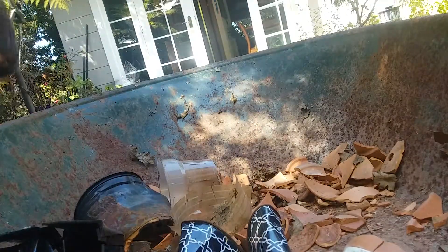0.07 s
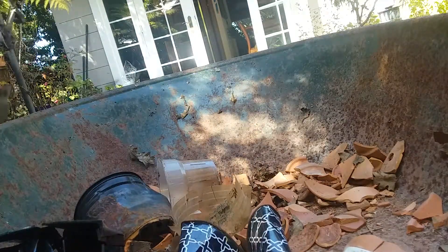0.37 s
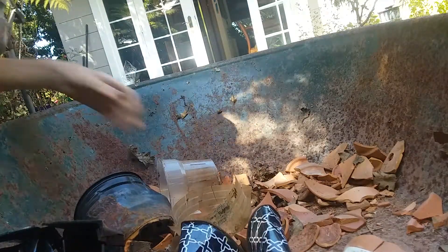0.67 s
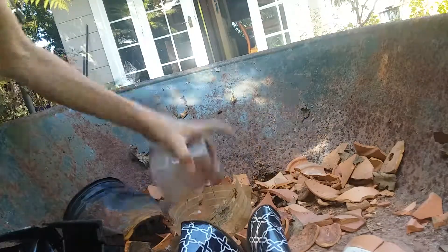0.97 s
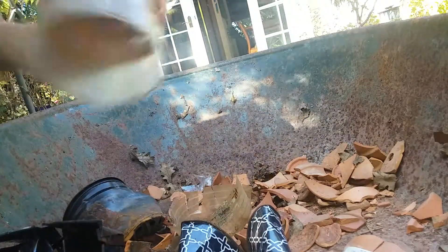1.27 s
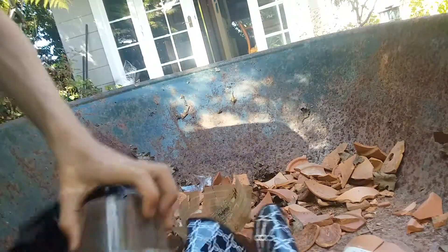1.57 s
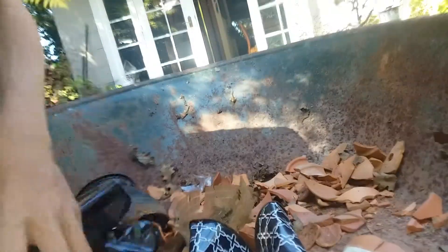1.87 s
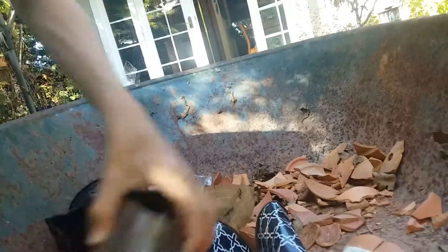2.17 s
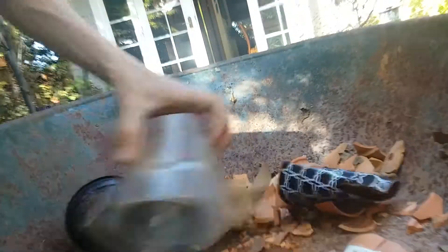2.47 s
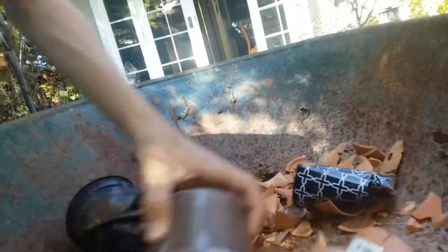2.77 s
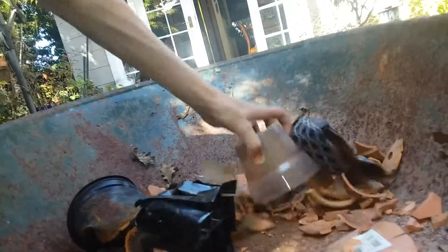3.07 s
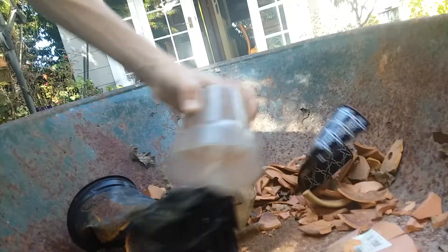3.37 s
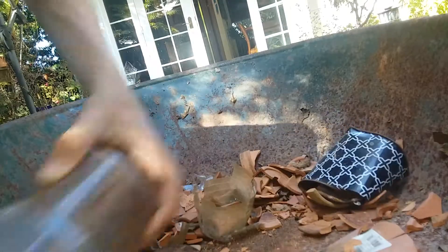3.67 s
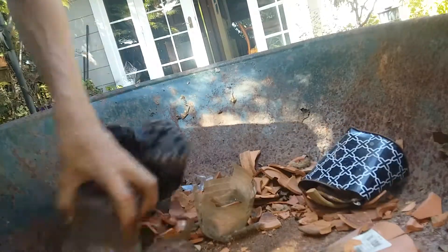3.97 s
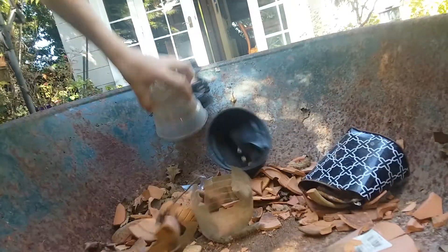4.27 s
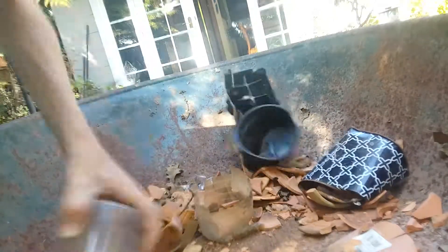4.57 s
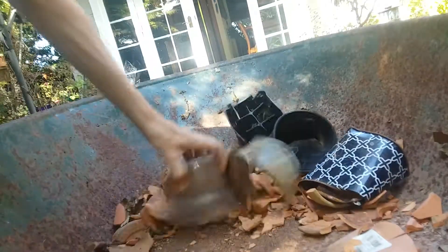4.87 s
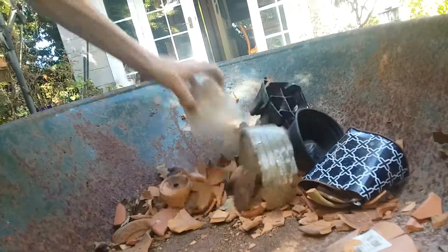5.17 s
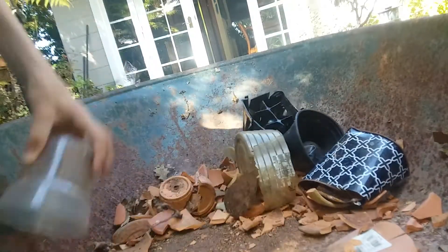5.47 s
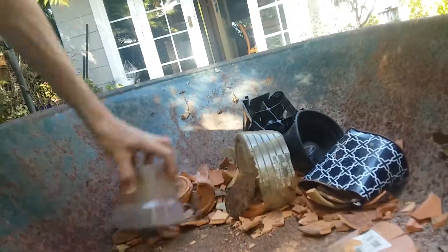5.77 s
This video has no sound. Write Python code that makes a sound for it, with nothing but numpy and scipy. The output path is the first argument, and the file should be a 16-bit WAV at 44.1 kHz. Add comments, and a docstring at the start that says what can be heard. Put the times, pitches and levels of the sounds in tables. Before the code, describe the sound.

Broken clay shards crunch, scrape and clink as a plastic tub scoops through them in a booming steel wheelbarrow, with light pots clacking.

```python
"""Terracotta shards in a wheelbarrow

Outdoors, stereo microphones close to the steel tray. A hand scoops through the shards with a plastic
tub. Each shove builds, holds and settles: a dense crunch of tiny contacts that makes the tray drone.
Shards clink, light flowerpots clack and tumble, and heavier bumps boom in the sheet steel."""
import sys
import numpy as np
from scipy import signal
from scipy.fft import rfft, irfft, next_fast_len
from scipy.io import wavfile
from scipy.ndimage import map_coordinates

SR = 44100
rng = np.random.default_rng(int(sys.argv[2]) if len(sys.argv) > 2 else 0)


def file_out(sig):
    """Save sig as 16-bit WAV at sys.argv[1]."""
    # one column per channel
    cols = np.atleast_2d(sig).T
    # limit, then scale
    lim = np.clip(cols, -1, 1)
    pcm = np.round(lim * 32767).astype(np.int16)
    wavfile.write(sys.argv[1], SR, pcm)


N = 257103

# Levels are relative within each layer; balance is left minus right.
# outdoor air: f/Hz, level/dB
AIR_SPECTRUM = [(15, -95), (25, -42), (48, -2), (108, -3.5), (130, -14.5), (145, -3), (285, -17.5),
                (677, -15.5), (1940, -26.5), (2690, -24), (2990, -24.5), (6050, -32), (7310, -31.5),
                (8590, -42), (16000, -48)]
# faint background tones: f/Hz, level/dB
FAINT_TONES = [(668, -49.5), (920, -55), (1660, -60)]
# sharp ticks and dull taps close by, the first two from handling: t/s, tick level/dB, tap level/dB
TICKS = [(0.0348, -60, -32), (0.047, -43, -42), (0.588, -43.5, -40.5), (0.808, -34.5, -21.5),
         (0.8872, -35, -29), (1.3738, -24, -13), (1.465, -13, -15), (1.5597, -24, -12), (1.6249, -42, -18),
         (1.9485, -19.5, -25), (2.439, -22.5, -18), (2.495, -36, -33), (2.5372, -15.5, -28),
         (2.6148, -18, -24), (3.0391, -24, -15), (3.2027, -23, -16), (3.3424, -17.5, -32),
         (3.4091, -17, -44), (3.4336, -14.5, -18), (3.4887, -19.5, -30), (3.5682, -26, -35),
         (3.696, -28, -38.5), (3.8299, -22.5, -35.5), (3.984, -14, -37), (4.0309, -13.5, -15.5),
         (4.168, -21, -20), (4.212, -15, -35), (4.4142, -28.5, -21.5), (4.475, -30, -17.5),
         (4.5048, -27.5, -21), (5.2801, -30, -30), (5.446, -15, -38), (5.4856, -25, -24)]
# spectra of a sharp tick, a dull tap and the rattle of a knock: f/Hz, level/dB
TICK_SPECTRUM = [(300, -18), (1500, 20), (4000, 16.5), (7000, 8.5), (9000, 3.5), (12000, -0.5), (16000, -1)]
TAP_SPECTRUM = [(100, -21.5), (400, 0.5), (800, -0.5), (1600, -4.5), (2500, -13.5), (4000, -32),
                (8000, -41), (16000, -51)]
RATTLE_SPECTRUM = [(100, -37), (400, 3.5), (900, -21), (1600, 3), (2500, -6), (4000, -18), (8000, -26),
                   (16000, -43)]
# echo between the tray walls: f/Hz, t60/s
WALL_DECAY = [(200, 0.056), (1500, 0.18), (4000, 0.065), (12000, 0.064)]
# short hollow knocks (pots, hard hits on the tray, a faint handling tap): t/s, level/dB, f/Hz
HOLLOW_KNOCKS = [(0.091, -26.5, 770), (1.405, -16, 506), (1.625, -5.5, 751), (1.724, -12, 524),
                 (1.948, -12.5, 1968), (1.997, -6, 2225), (2.538, -5.5, 589), (3.203, 0, 956),
                 (3.218, -0.5, 647), (3.293, -4, 542), (3.305, -1, 1599), (3.405, -14, 1550),
                 (3.432, -10, 1507), (4.367, -21, 608), (4.402, -6, 699), (4.477, -22, 756),
                 (4.569, -10, 2180), (4.594, -3.5, 1666), (5.578, -12, 1660)]
# shoves into the pile: t/s, build-up/s, hold/s, settling t60/s, crunch level/dB, grit level/dB,
# pressure on the tray/dB, balance/dB
SHOVES = [(0.783, 0.035, .003, 0.24, -30.5, -50, -30, 2.5), (0.857, 0.03, 0.0067, 0.32, -33, -50, -31, 2.5),
          (1.366, .008, 0.011, 0.09, -17, -22.5, -39, 7.5),
          (1.387, 0.017, 0.024, 0.4, -17, -31.5, -14.5, 5.5),
          (1.474, 0.034, 0.0088, 0.44, -15, -27, -15.5, 3.5),
          (1.668, 0.054, 0.0069, .28, -19, -34.5, -14, 3),
          (1.997, 0.0039, 0.044, 0.19, -20, -34.5, -29.5, 7),
          (2.07, 0.033, 0.074, 0.39, -16.5, -28, -21.5, 4), (2.164, 0.036, 0.12, 0.42, -16, -31.5, -23, 6),
          (2.436, .004, 0.068, 0.34, -30, -45.5, -32.5, 0),
          (2.54, 0.0031, 0.022, 0.17, -24.5, -38.5, -19.5, -1),
          (2.621, 0.0046, .03, 0.25, -20.5, -31, -34, 8), (2.646, .025, 0.044, 0.65, -13.5, -30, -16, 0),
          (2.698, 0.061, .14, 0.6, -12, -27.5, -17.5, -0.5),
          (2.967, 0.016, .02, 0.43, -24.5, -33.5, -31, 2.5), (3.198, 0.011, 0.041, 0.39, -20, -48, -27, 1),
          (3.285, .006, 0.028, 0.27, -20, -48, -32, 0.5), (3.371, 0.078, 0.022, .28, -19.5, -35, -28, 5.5),
          (3.695, 0.0088, 0.048, 0.25, -38, -50.5, -52, 6.5),
          (3.743, 0.085, 0.076, .3, -29, -38.5, -29, 7.5), (3.891, 0.022, 0.05, 0.84, -21.5, -34, -18, 2.5),
          (3.987, 0.037, 0.058, 0.26, -19.5, -32, -45, 3.5),
          (4.143, 0.024, 0.0094, 0.068, -24.5, -31.5, -23, 2.5),
          (4.198, 0.003, 0.0078, 0.44, -30, -38, -30, 0), (4.481, 0.0094, 0.05, .2, -38, -48, -27, 2.5),
          (4.568, 0.012, 0.032, 0.41, -23, -28.5, -30, 5),
          (4.622, 0.056, 0.15, 0.38, -18.5, -30, -17.5, 2.5),
          (4.807, 0.053, 0.15, 0.52, -19.5, -31, -27.5, 2.5),
          (5.083, 0.017, 0.01, 0.49, -27, -37.5, -22.5, 3), (5.124, 0.028, 0.08, 1, -47.5, -47.5, -30, 1.5),
          (5.443, 0.0061, 0.022, 0.34, -27.5, -54, -16.5, 5.5),
          (5.567, 0.086, 0.017, 0.074, -24.5, -35, -14.5, 3),
          (5.693, 0.065, 0.043, 0.38, -19, -30.5, -17.5, 1)]
# spectra of coarse shards, fine grit and the damped tray floor: f/Hz, level/dB
CRUNCH_SPECTRUM = [(60, -68.5), (250, -11), (620, -2.5), (900, -4.5), (1250, -5), (1700, 0), (2400, -1),
                   (3000, -8), (4000, -12), (5500, -22), (9000, -35.5), (16000, -36.5)]
GRIT_SPECTRUM = [(500, -42), (2500, 5), (4000, 7), (5500, -1), (7200, 0), (8500, -8.5), (10500, -5),
                 (13000, -9), (16000, -15)]
FLOOR_SPECTRUM = [(30, -10), (70, -17.5), (110, 3.5), (200, 8.5), (270, -1.5), (450, 4), (700, -14.5),
                  (1200, -6.5), (4000, -46)]
# panel resonances that the scraping sets singing: f/Hz, width/Hz, level/dB
PANEL_MODES = [(592, 28, 3.5), (705, 29, -9), (765, 26, -7), (982, 26, 4.5), (1235, 27, -3), (1618, 73, 0),
               (1780, 55, -10)]
# modes of the steel tray: f/Hz, level/dB, t60/s, balance/dB
TRAY_MODES = [(94.6, 5.5, 0.27, 7.5), (142.4, 3.5, 0.13, 14.5), (175.2, -3, 0.088, 12.5),
              (218, 1.5, 0.42, 13), (312, -3.5, 0.27, 20), (332.6, 3, 0.3, 9), (382.5, 1, 0.47, 2.5),
              (448, 8.5, 0.24, 1), (500, -6, 0.46, 4), (609.6, 2, 0.28, -13), (682, -6.5, 0.54, 11),
              (770, -1, 0.16, 17.5), (833, 8.5, 0.066, 16), (987, 6.5, 0.13, -6), (1037, 1.5, 0.18, -10),
              (1206, 4.5, 0.065, 10.5)]
# bumps on the tray: t/s, level/dB, favoured f/Hz
TRAY_BUMPS = [(0.806, -16.5, 199.6), (0.93, -24, 148), (1.399, -6.5, 438), (1.492, -10.5, 451),
              (1.624, -5, 132.4), (1.646, -10.5, 200), (1.79, -14.5, 382), (1.809, -13.5, 221),
              (1.887, -24.5, 229), (2.33, -12.5, 138), (2.41, -16.5, 120), (2.555, -11.5, 225),
              (2.651, -11, 320), (2.773, -9.5, 121), (3.204, -15.5, 501), (3.919, -14.5, 470),
              (4.365, -14.5, 180), (4.4, -4, 156), (4.643, -13.5, 228), (5.142, -14, 173),
              (5.185, -13.5, 200), (5.233, -14, 172), (5.384, -21.5, 106), (5.422, -14, 137),
              (5.631, -16.5, 377), (5.773, -14, 323)]
# single shards ringing out: t/s, f/Hz, level/dB
CLINKS = [(1.376, 3900, -25), (1.997, 2137, -21), (2.035, 3690, -20), (2.286, 1530, -21),
          (2.497, 1636, -23), (2.541, 6670, -30.5), (2.807, 5550, -22), (2.989, 7400, -29),
          (3.097, 5280, -37), (3.184, 2460, -31), (3.408, 1523, -19.5), (3.434, 1494, -16.5),
          (4.572, 2080, -17.5), (4.941, 1660, -18.5), (5.447, 2450, -22.5)]
# modes of a curved shard: multiple of its pitch, level/dB
SHARD_MODES = [(0.999, 6.5), (1.51, -7.5), (2.2, -9)]
# colour of the two microphones: f/Hz, balance/dB
MIC_BALANCE = [(200, 11.5), (600, -1), (1500, 0), (4400, 1), (7000, -3), (10500, -9), (12500, -2),
               (15000, 2)]

FAINT_PEAK_S, FAINT_RISE_S, FAINT_FADE_S = 0.18, 0.25, 1  # rise and fade each span 60 dB
SHOVE_BITE_DB = -12  # a shove starts this far below full strength
GRIT_SETTLES, TRAY_SETTLES = 0.79, 1.47  # settling times, as multiples of the shards'
REBOUND_S, REBOUND_DB = 0.03, -9.5
LOW_CUT_HZ, TOP_HZ = 68, 15800


def amp(db):
    """Decibels to gain."""
    return 10 ** (np.asarray(db) / 20)


def unit(x):
    """Scale to rms 1."""
    return x / np.sqrt(np.mean(x ** 2) + 1e-20)


def along(points, hz):
    """Read (f/Hz, value) points on a log frequency axis."""
    f, values = np.transpose(points)
    return np.interp(np.log(hz + 1), np.log(f + 1), values)


def sides(balance_db):
    """Gains at the left and right microphones."""
    return amp(np.array([[.5], [-.5]]) * balance_db)


def wobble(rate):
    """A smooth random curve, rate knots a second."""
    knots = rng.standard_normal(int(N * rate / SR) + 4)
    return map_coordinates(knots, [np.arange(N) * rate / SR])


def colour(x, spectrum):
    """Minimum-phase filter with the gain of the (f/Hz, level/dB) points."""
    size = 2048
    cepstrum = irfft(np.log(amp(along(spectrum, np.fft.rfftfreq(size, 1 / SR)))))
    cepstrum[1:size // 2] *= 2
    cepstrum[size // 2 + 1:] = 0
    impulse = irfft(np.exp(rfft(cepstrum)))
    return signal.oaconvolve(x, impulse[None], axes=1)[:, :x.shape[1]]


def equalise(x, response):
    """Filter by a gain given as a function of f/Hz."""
    size = next_fast_len(N + SR // 4)
    return irfft(rfft(x, size) * response(np.fft.rfftfreq(size, 1 / SR)), size)[:, :N]


def add(track, s, sound):
    """Mix a sound into a track at s seconds."""
    part = track[:, max(round(s * SR), 0):][:, :sound.shape[-1]]
    part += sound[..., :part.shape[1]]


def outdoor_air():
    """Faint air all around the microphones, with a low rumble in the distance."""
    air = rng.standard_normal(N) + 1.12 * rng.standard_normal((2, N))
    return amp(-50 + wobble(3.06)) * unit(colour(air, AIR_SPECTRUM)) * sides(0.28)


def faint_tones():
    """Rough, wavering tones swell and fade in the background, barely above the air."""
    out, t = np.zeros(N), np.arange(N) / SR
    swell_db = -60 * np.maximum((FAINT_PEAK_S - t) / FAINT_RISE_S, (t - FAINT_PEAK_S) / FAINT_FADE_S)
    for hz, db in FAINT_TONES:
        waver = wobble(60) + 1j * wobble(60)
        out += amp(db + swell_db) * np.real(waver * np.exp(2j * np.pi * hz * t))
    return out


def ticks_and_taps():
    """Brief contacts close by, the first from handling: a sharp tick, a dull tap, a weak after-ring."""
    ticks, taps, t = np.zeros((2, N)), np.zeros((2, N)), np.arange(SR // 5) / SR
    tap_fade = amp(-60 * t / 0.025) + 0.13 * amp(-60 * t / 0.31)
    for s, tick_db, tap_db in TICKS:
        noise = rng.standard_normal((4, len(t)))
        add(ticks, s, noise[:2] * amp(tick_db - 10 - 60 * t / 0.022))
        add(taps, s, noise[2:] * amp(tap_db + 13) * tap_fade)
    return colour(ticks, TICK_SPECTRUM) + colour(taps, TAP_SPECTRUM)


def wall_echo(x):
    """Sound bounces between the steel walls, the midrange lasting longest."""
    hz, t, noise = signal.stft(rng.standard_normal((2, SR // 3)), SR, nperseg=256)
    fade = amp(-60 * t / along(WALL_DECAY, hz)[:, None])
    _, tail = signal.istft(noise * fade, SR, nperseg=256)
    tail = np.pad(tail / np.linalg.norm(tail[0]), ((0, 0), (SR // 500, 0)))  # arrives 2 ms late
    return signal.fftconvolve(x, tail, axes=1)[:, :N]


def hollow_knocks():
    """Pots, hard hits on the tray and a handling tap: clusters of quickly dying modes, with a rattle."""
    out, t = np.zeros((2, N)), np.arange(SR // 5) / SR
    modes = 14
    for s, db, pitch_hz in HOLLOW_KNOCKS:
        detune, damping, right, left = rng.standard_normal((modes, 4)).T[:, :, None]
        offset = np.tanh(detune)
        hz = pitch_hz * np.exp(0.51 * offset)
        t60 = 0.16 * np.exp(np.tanh(damping) / 4)
        fade = amp(-5 * np.abs(offset) - 60 * t / t60)
        mic_phases = np.pi * np.array([left, right])
        ring = np.sum(fade * np.sin(2 * np.pi * hz * t + mic_phases), axis=1)
        ring *= 1 - np.exp(-t * pitch_hz)  # the note takes about a cycle to build
        rattle = colour(rng.standard_normal((2, len(t))) * amp(-60 * t / 0.27), RATTLE_SPECTRUM)
        add(out, s, amp(db - 10) * (ring / np.sqrt(modes / 2) + 0.55 * rattle))
    return out


def shove_envelopes():
    """Gains of crunch, grit and pressure: each shove bites, builds, holds and dies as the pile settles."""
    power = np.zeros((3, N))
    settle_scale = np.array([[1], [GRIT_SETTLES], [TRAY_SETTLES]])
    for s, build_s, hold_s, t60, *levels_db, _ in SHOVES:
        t = np.arange(int((build_s + hold_s + 1.5 * t60) * SR)) / SR
        push_db = SHOVE_BITE_DB * np.maximum(1 - t / build_s, 0)
        settle_db = -60 * np.maximum(t - build_s - hold_s, 0) / (t60 * settle_scale)
        add(power, s, amp(np.array(levels_db)[:, None] + push_db + settle_db) ** 2)
    return np.sqrt(power)


def hand_balance():
    """Balance in dB: the pile's noise crosses the microphones from one shove to the next."""
    s, build_s, *_, balance_db = np.transpose(SHOVES)
    return np.interp(np.arange(N) / SR, s + build_s, balance_db)


def contacts(rate, spread_db):
    """Tiny random impacts, rate a second, each picked up differently by the two microphones."""
    size, left, right = rng.standard_normal((int(rate * N / SR), 3)).T
    starts = rng.integers(0, N, len(size))
    strength = amp(spread_db * np.minimum(size, 2))
    return np.array([np.bincount(starts, strength * pickup, N) for pickup in (left, right)])


def scraping(crunch, grit):
    """The tub ploughs through shards and sand, catching and slipping; now and then an edge clicks."""
    slips = amp(0.7 * wobble(120))
    coarse = unit(colour(contacts(rate=4000, spread_db=-1), CRUNCH_SPECTRUM))
    fine = unit(colour(contacts(rate=11000, spread_db=-4), GRIT_SPECTRUM))
    t = np.arange(SR // 50) / SR
    crack = rng.standard_normal((2, len(t))) * amp(-60 * t / 0.026)
    edges = signal.oaconvolve(contacts(rate=55, spread_db=1), crack, axes=1)[:, :N]
    fine += 0.55 * unit(colour(edges, GRIT_SPECTRUM))
    coarse += 0.3 * unit(colour(edges, CRUNCH_SPECTRUM))
    return slips * (amp(-3) * crunch * coarse + amp(1) * grit * fine)


def singing_panels(scrape):
    """Shards scraping on the steel sound through its narrow panel resonances."""
    def response(f):
        return sum(amp(db) * 1j * f * width / (hz ** 2 - f ** 2 + 1j * f * width)
                   for hz, width, db in PANEL_MODES)
    return equalise(scrape, response)


def shard_note(hz, right_phase, t60_at_1khz):
    """One note of fired clay: the smaller the piece, the higher and shorter it rings."""
    t = np.arange(SR // 10) / SR
    fade = amp(-60 * t * np.sqrt(hz / 1000) / t60_at_1khz)
    return fade * np.sin(2 * np.pi * hz * t + np.array([[0], [right_phase]]))


def jostling(push, centre_hz, scatter, spectrum, rate, level_db):
    """Shards in the pile ring against each other, as loudly as the tub pushes them."""
    out = np.zeros((2, N))
    hits = rng.standard_normal((int(rate * N / SR), 3))
    for start, (detune, strength, phase) in zip(rng.integers(0, N, len(hits)), hits):
        hz = min(centre_hz * np.exp(scatter * detune), SR / 2)
        db = level_db + 0.7 * along(spectrum, hz) + 3 * min(strength, 1)
        add(out, start / SR, push[start] * amp(db) * shard_note(hz, 2 * phase, t60_at_1khz=0.11))
    return out


def tray_ring(weights_db, chance_db):
    """The tray's answer to one blow: low modes reach both microphones in step, high ones do not."""
    t = np.arange(SR // 3) / SR
    ring = np.zeros((2, len(t)))
    for (hz, db, t60, balance_db), weight_db in zip(TRAY_MODES, weights_db):
        mic_phases = np.array([[1], [-1]]) * rng.normal() * min(hz / 1600, 2)
        fade = amp(db + weight_db + chance_db * rng.normal() - 60 * t / t60)
        ring += sides(balance_db) * fade * np.sin(2 * np.pi * hz * t + mic_phases)
    return ring


def tray_drone(pressure):
    """Dragged shards keep the steel ringing; which modes answer changes as the load moves."""
    out, hz = np.zeros((2, N)), np.transpose(TRAY_MODES)[0]
    force = rng.standard_normal(N) * pressure
    hop = SR // 4
    for start in range(0, N, hop):
        ring = tray_ring(-np.log2(hz / hz[0]), chance_db=1)
        ring /= np.sqrt(np.sum(ring ** 2) / 2)
        add(out, start / SR, signal.fftconvolve(force[None, start:start + hop], ring, axes=1))
    # the loaded part of the floor is damped and only rumbles
    noise = rng.standard_normal(N) + 0.6 * rng.standard_normal((2, N))
    rumble = unit(colour(noise, FLOOR_SPECTRUM))
    return amp(-7.5) * out + amp(-4.5) * pressure * rumble * sides(5.3)


def tray_bumps():
    """Each blow favours the tray modes near its own pitch, over a dull push; each rebounds once."""
    out, hz = np.zeros((2, N)), np.transpose(TRAY_MODES)[0]
    for s, db, pitch_hz in TRAY_BUMPS:
        for bounce in (0, 1):
            ring = tray_ring(-9.5 * np.abs(np.log2(hz / pitch_hz)), chance_db=2)
            t = np.arange(ring.shape[1]) / SR
            ring *= 1 - np.exp(-t / 0.0031)
            ring /= np.abs(ring.mean(axis=0)).max()
            push = np.sin(2 * np.pi * pitch_hz * t) * amp(-60 * t / 0.21)
            add(out, s + bounce * REBOUND_S, amp(db - 2 + bounce * REBOUND_DB) * (ring + 0.53 * push))
    return out


def shard_clinks():
    """A loose shard rings out and chatters on its neighbours; its uneven shape splits the note."""
    out = np.zeros((2, N))
    for s, hz, db in CLINKS:
        for bounce, (detune, phase) in enumerate(rng.standard_normal((3, 2))):
            pitch_hz = hz * (1 + 0.03 * detune * min(bounce, 1))
            note = sum(amp(mode_db) * shard_note(pitch_hz * multiple, phase, t60_at_1khz=0.059)
                       for multiple, mode_db in SHARD_MODES)
            add(out, s + 0.004 * bounce, amp(db - 2.5 - 1.6 * bounce) * note)
    return out


def scene():
    """Close to the tray: the shard noise follows the hand, and the steel rings louder on the left."""
    crunch, grit, pressure = shove_envelopes()
    large = jostling(crunch, centre_hz=1510, scatter=0.59, spectrum=CRUNCH_SPECTRUM,
                     rate=150, level_db=-4)
    small = jostling(grit, centre_hz=6060, scatter=0.31, spectrum=GRIT_SPECTRUM, rate=98, level_db=1)
    scrape = scraping(crunch, grit)
    clatter = scrape + amp(-2) * singing_panels(scrape) + large + small
    clatter += ticks_and_taps() + hollow_knocks() + shard_clinks()
    clatter *= sides(hand_balance())
    clatter += amp(-7.5) * wall_echo(clatter)
    clatter = equalise(clatter, lambda f: sides(along(MIC_BALANCE, f)))
    left, right = tray_drone(pressure) + tray_bumps()
    steel = np.array([np.pad(left, (SR // 3500, 0))[:N], right])  # 0.3 ms later at the left microphone
    return clatter + steel + outdoor_air() + faint_tones()


def record(dry):
    """The recorder cuts the deep bass, rounds off the highest peaks and keeps nothing above its band."""
    low_cut = signal.sosfilt(signal.butter(3, LOW_CUT_HZ, "highpass", fs=SR, output="sos"), dry)
    rounded = low_cut / (1 + np.abs(low_cut) ** 6) ** (1 / 6)
    return equalise(rounded, lambda f: f < TOP_HZ)


dry = scene()
out = record(dry)
file_out(out)
```